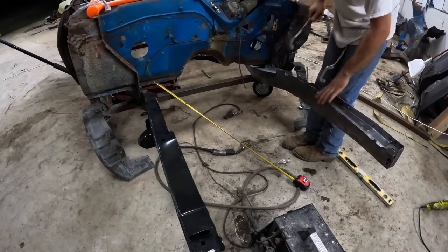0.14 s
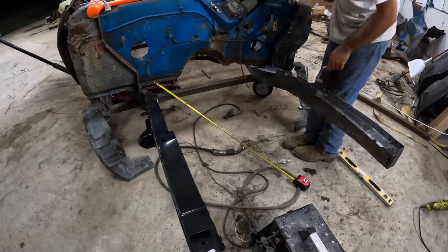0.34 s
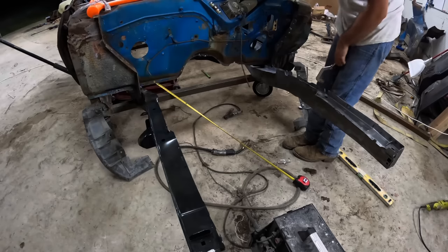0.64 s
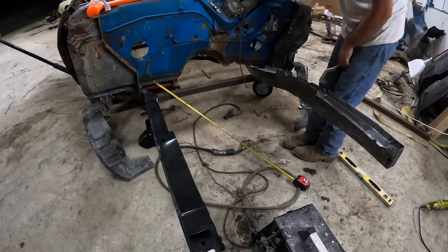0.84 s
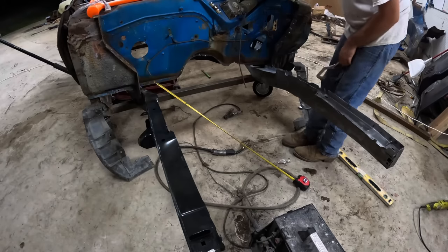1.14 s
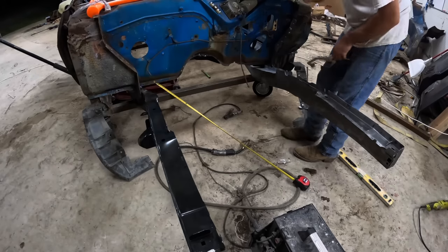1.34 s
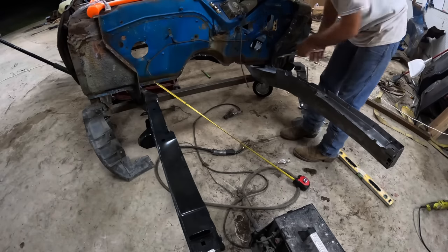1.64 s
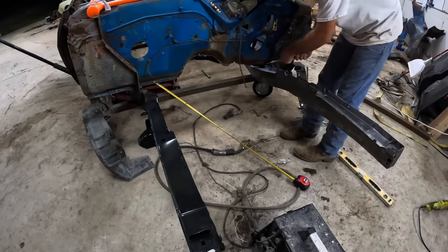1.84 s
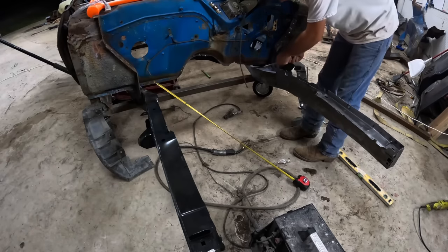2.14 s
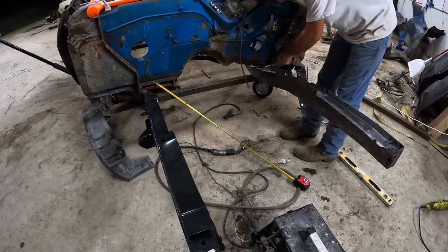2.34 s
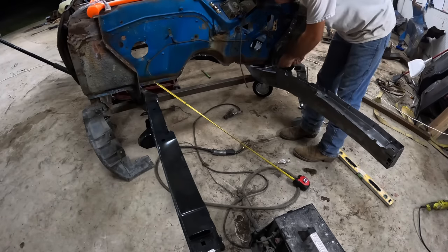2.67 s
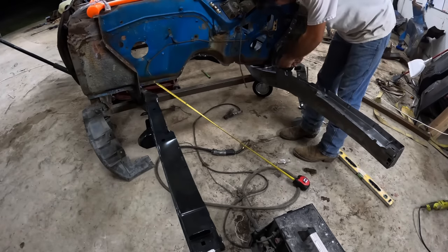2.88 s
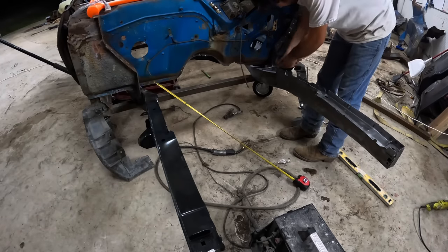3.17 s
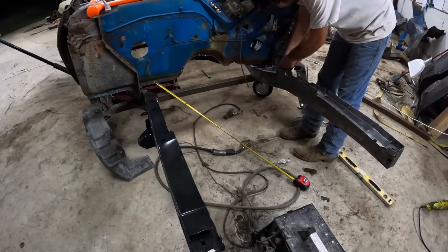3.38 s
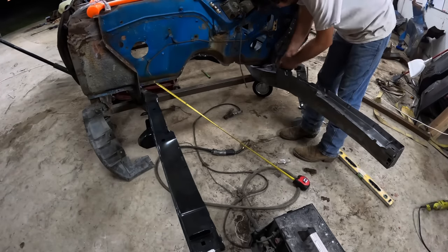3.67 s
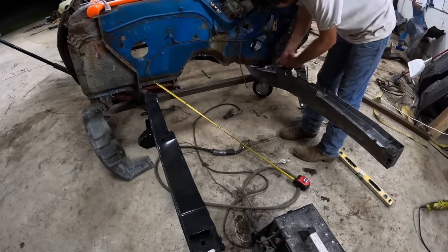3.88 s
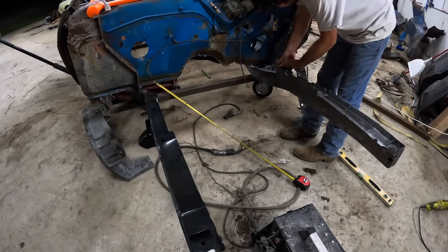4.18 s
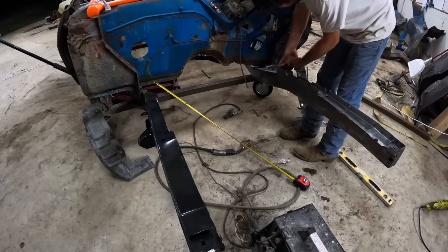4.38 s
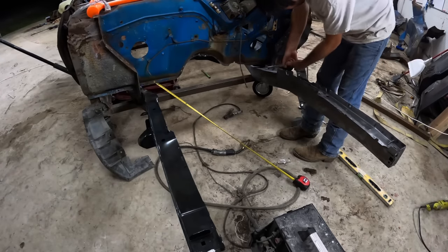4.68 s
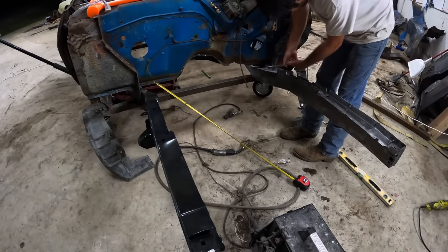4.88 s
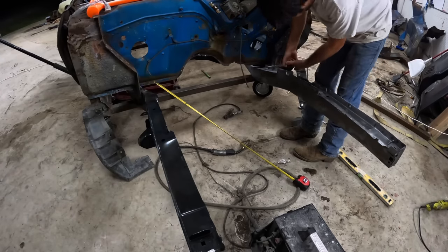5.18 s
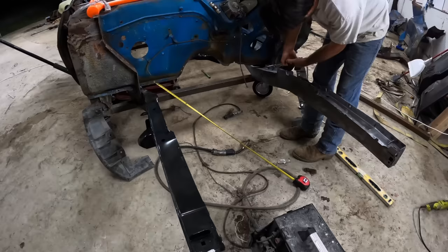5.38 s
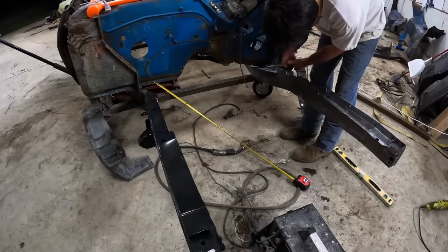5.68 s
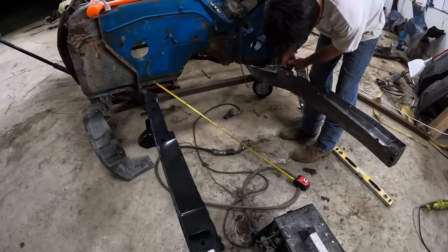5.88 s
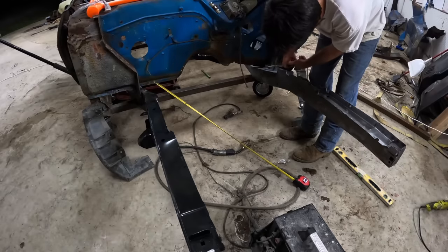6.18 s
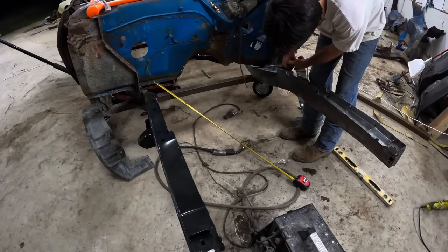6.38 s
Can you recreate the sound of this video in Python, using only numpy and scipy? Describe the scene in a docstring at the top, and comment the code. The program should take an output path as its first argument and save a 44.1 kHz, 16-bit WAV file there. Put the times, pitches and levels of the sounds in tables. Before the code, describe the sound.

Hand work on loose steel: dull thuds with rattling cracks, brief high metallic pings and gritty slides, irregularly spaced with gaps. Behind it, through an open door, a heavy vehicle drives by with a wavering low exhaust drone and a soft rush of tyres peaking just after the middle. The strongest clang, with a clear high ring, comes near the end, then faint ticks. Stereo, modestly reverberant workshop, very faint hiss.

```python
"""A steel clamp is knocked and slid onto a loose steel rail in an open workshop with a concrete floor.
Blows ring modes of rail and clamp and shake out gritty rattle; dense uneven grit makes the scrapes.
Outside the open door a heavy vehicle drives past: two sines give an exhaust note that sinks in pitch,
shaped noise the rumble, whine and roar of its tyres. A faint whistle, hiss and moving air lie beneath.
The stereo microphones hear a short diffuse room tail behind the rail and its rattle."""
import sys
import numpy as np
from scipy import signal
from scipy.fft import rfft, irfft
from scipy.io import wavfile

SR = 44100
rng = np.random.default_rng(int(sys.argv[2]) if len(sys.argv) > 2 else 0)


def digitize_waveform(pressure):
    """Quantize a signal to 16-bit integers and store it at the path in sys.argv[1].

    Rows of a 2-D input are taken as channels; values are limited to [-1, 1].
    """
    field = np.atleast_2d(pressure).T
    bounded = np.clip(field, -1, 1)
    quanta = np.round(bounded * 32767).astype(np.int16)
    wavfile.write(sys.argv[1], SR, quanta)


N = 287532

# Spectra below give relative level: each shaped noise is brought to unit rms before its level is set.

# Microphone hiss: (frequency [Hz], relative level [dB])
HISS_SPECTRUM = [(1180, -40.5), (2000, -30.5), (2870, -57.5), (4570, 14.5), (5320, 5.5), (6620, -3),
                 (15000, -19.5)]
HISS_DB = -75
# Air moving over the microphones: (frequency [Hz], relative level [dB])
AIR_SPECTRUM = [(12, -42), (20, -4.5), (48, -8), (65, -14.5), (84, -33), (140, -120)]
AIR_DB = -48.5
# Microphone colour: (frequency [Hz], gain [dB])
CAPSULE_COLOUR = [(20, 1.5), (7000, -1.5), (8300, -7), (15000, -1)]
CUTOFF_HZ = 15400
# Stereo width of noise and room tail: (frequency [Hz], side minus mid [dB])
STEREO_SPREAD = [(60, -45.5), (130, -67), (290, -22), (630, -12.5), (1390, -9), (3060, -4.5), (6710, -13.5),
                 (14700, -2)]

# A faint steady whistle
WHISTLE_HZ, WHISTLE_WIDTH_HZ, WHISTLE_DB = 4650, 260, -84

# Stereo lean of vehicle and whistle: (frequency [Hz], left minus right [dB])
OUTSIDE_LEAN = [(60, 0.0), (180, 0.0), (540, 1.0), (1630, 2.5), (4900, 1.5), (14700, 3.0)]
# Distant road noise, before a trim per layer: (time [s], rumble level [dB], tyre whine level [dB])
ROAD_LEVELS = [(0.0, -48.5, -61), (0.5, -58, -61.5), (0.9, -52.5, -55.5), (1.5, -47.5, -54),
               (2.0, -49, -47), (2.5, -39.5, -39), (3.0, -46, -46), (3.25, -43.5, -48), (3.6, -37, -36),
               (3.92, -32.5, -34.5), (4.12, -38, -43), (4.45, -41, -48), (5.121, -44, -53),
               (5.54, -46, -56.5), (6.52, -55.5, -64.5)]
# Low road rumble: (frequency [Hz], relative level [dB])
RUMBLE_SPECTRUM = [(35, -29), (60, -9.5), (100, -1.5), (135, -7.5), (289, -13), (344, -24.5), (525, -25.5),
                   (700, -55), (910, -75), (1540, -120)]
# Far tyre whine: (frequency [Hz], relative level [dB])
WHINE_SPECTRUM = [(290, -59.5), (500, -35), (576, -12.5), (745, -13.5), (922, -4.5), (1250, -2.5),
                  (1680, -10.5), (4740, -24), (6300, -27), (7060, -29), (7910, -31), (15000, -56.5)]
# Near tyre roar: (frequency [Hz], relative level [dB])
ROAR_SPECTRUM = [(130, -41), (220, 11.5), (342, -12.5), (401, 6.5), (496, -4), (646, 2), (2430, -22.5),
                 (5680, -21), (12100, -45.5), (15000, -73)]
# Near tyre roar peaks as the vehicle crosses the doorway; level before its trim
PASS_S, PASS_WIDTH_S, PASS_DB, PASS_FALL_DB = 3.676, 0.29, -29, 22
# Exhaust note, swelling and dropping out as the path changes, before a slight waver:
# (time [s], firing rate [Hz], fundamental level [dB])
EXHAUST_NOTE = [(0.0, 89.6, -42.5), (0.13, 89.6, -52), (0.27, 89.3, -43), (0.95, 87.3, -36.5),
                (1.2, 86.8, -39), (1.46, 87, -64), (1.6, 86.7, -38.5), (1.96, 85.8, -27),
                (2.2, 85.7, -31.5), (2.54, 84.2, -27), (2.6, 84.1, -38.5), (2.79, 83.6, -34.5),
                (2.86, 83.3, -27), (3.08, 83, -23), (3.33, 81.9, -25.5), (3.48, 80.8, -41.5),
                (3.68, 80.4, -48), (3.75, 81.1, -37), (4.22, 80.6, -25.5), (4.62, 79.8, -32),
                (4.75, 80.2, -45.5), (4.9, 80, -34.5), (5.12, 80, -39), (5.29, 79.6, -32), (5.4, 77.6, -43),
                (5.48, 75.6, -38), (5.56, 75, -60), (5.62, 78, -41)]
# Exhaust at twice the firing rate, before a waver: (time [s], level [dB])
EXHAUST_SECOND_ORDER = [(2.5, -41.5), (2.98, -52.5), (3.46, -45.5), (3.82, -30.5), (3.92, -34.5),
                        (4.25, -33.5), (4.35, -42.5), (4.7, -40.5), (5.26, -50), (5.65, -66)]

# Reverberation of the workshop: (frequency [Hz], t60 [s])
WORKSHOP_T60 = [(100, 0.82), (500, 0.57), (2000, 0.41), (6000, 0.73), (12000, 0.55)]
ROOM_EDGES_HZ = 22 * 2 ** np.arange(0, 9.6, .5)   # half-octave bands of the tail
# Stereo lean of the steel work: (frequency [Hz], left minus right [dB])
STEEL_LEAN = [(60, 0.0), (130, 0.0), (290, -0.5), (630, -1.0), (1390, -1.0), (3060, -1.5), (6710, -0.5),
              (14700, 1.0)]
# Stereo phase of the steel work: (frequency [Hz], lead of left [rad])
STEEL_PHASE = [(0, 0), (2500, -0.081), (5860, 0.35), (11700, 0.36), (12400, 0.3), (13300, -0.2),
               (13500, 0.1), (14900, 0.0)]

# Steel slid along steel: (start [s], swell [s], hold [s], fade [s], level held [dB])
SCRAPE_STROKES = [(-0.1, 0.055, 0.07, 0.23, -55), (0.987, 0.037, 0.064, 0.23, -35.5),
                  (1.403, 0.082, 0.027, 0.076, -49), (5.356, 0.082, .07, 0.15, -45),
                  (5.666, 0.12, .01, 0.016, -41)]
# Scraping grit: (frequency [Hz], relative level [dB])
SCRAPE_SPECTRUM = [(180, -34), (300, -4), (814, -12), (1090, -6.5), (1370, -6.5), (1490, -14.5),
                   (4540, -10), (11900, -27), (15000, -42)]
SCRAPE_RANGE_DB = 20   # climbed in the swell, lost in the fade

# Clamp modes, damped by the hand: (frequency [Hz], relative level [dB], t60 [s])
CLAMP_MODES = [(3200, -10, .06), (3900, -9, .1), (4900, -8, .06), (5420, -8, .14), (5950, -3, .05),
               (6480, -4, .15)]
# Blows that set the clamp ringing, before chance and mode level:
# (time [s], peak level [dB], pitch favoured [Hz])
CLAMP_PINGS = [(1.0241, -12.5, 5070), (1.3104, -44, 5950), (2.1836, -24.5, 6370), (2.466, -16, 3900),
               (3.1991, -28, 4780), (3.8478, -19, 5330), (3.901, -14, 3820), (5.762, -5, 3296),
               (5.7824, -23.5, 6740)]

# Rail modes: (frequency [Hz], relative level [dB], t60 [s])
RAIL_MODES = [(98, -4, .15), (160, -4, .15), (190, -2, .15), (215, -6, .12), (265, -2, .14), (292, 0, .14),
              (328, 0, .14), (350, 0, .14), (380, -4, .12), (409, -6, .12), (458, -3, .12), (555, -5, .1),
              (598, -5, .1), (684, -3, .1), (740, -2, .1), (908, -1, .1), (969, -1, .1), (1012, -3, .08),
              (1150, -3, .08), (1190, -3, .08), (1413, -2, .09), (1500, -5, .06), (1709, -3, .07),
              (1860, -5, .06), (1978, -5, .06), (2190, -5, .06), (2503, -2, .08), (2632, -3, .07),
              (3050, -4, .06)]
# Blows, levels relative within the steel work: (time [s], thud level [dB],
# pitch favoured by the struck spot [Hz], crack level [dB], crack brightness [dB per octave])
STEEL_BLOWS = [(0.939, -13, 1020, -24, 3.5), (0.947, -12.5, 304, -16.5, 2.5),
               (0.9547, -24.5, 342, -19, -27), (0.9726, -17.5, 286, -28, -20), (1.0038, -18, 372, -29, -11),
               (1.0243, -19, 910, -31, 1.5), (1.0315, -17.5, 323, -40, -2), (1.053, -23, 975, -39, 1),
               (1.1929, -12, 370, -38, 3.5), (1.2045, -17, 410, -31, -8), (1.2443, -17.5, 365, -43, -4),
               (1.2577, -21.5, 557, -42, -2), (1.2842, -25.5, 694, -39, -12), (1.3086, -19, 300, -41.5, -2),
               (1.3393, -32, 245, -44.5, -3), (1.4389, -45, 193, -39.5, -8.5),
               (1.7875, -48, 179, -49.5, -2), (1.8746, -57, 200, -50, 7), (2.1847, -17, 810, -22, -9.5),
               (2.199, -20.5, 200, -45, -6), (2.229, -19, 213, -46, -8), (2.2513, -46, 880, -18.5, -4),
               (2.2545, -22, 760, -17, -2.5), (2.4583, -36, 710, -26, -3), (2.4654, -29, 710, -25.5, 2.5),
               (2.4798, -20, 482, -28, -21), (2.6295, -35, 880, -44, 2), (2.729, -41, 191, -34.5, -23),
               (2.828, -26.5, 1160, -27, -19), (3.1986, -36, 407, -40, 2), (3.8403, -30.5, 340, -27.5, -1),
               (3.8478, -16, 830, -20, -7), (3.8875, -19.5, 930, -18, -2), (3.8991, -23, 388, -20.5, -12),
               (4.0547, -33, 1020, -38.5, 3), (4.814, -24.5, 895, -32.5, -5), (5.2063, -52, 200, -51, 2.5),
               (5.2742, -53, 190, -50.5, -0.5), (5.7508, -19, 665, -30, -2), (5.7615, -16, 697, -18, -1.5),
               (5.7761, -15.5, 750, -42, -9), (5.7824, -9.5, 102, -23, -5), (5.8074, -24, 162, -33.5, 5),
               (5.824, -21.5, 264, -46, -11), (5.8613, -26.5, 352, -39, -12),
               (6.366, -36, 1150, -49.5, 2.5), (6.3824, -33.5, 400, -53, -16)]
THUD_FALLS_DB = 7, 10   # per octave below and above the favoured pitch
# Crack falls in dB per octave below the first pitch and above the second
CRACK_HZ, CRACK_TOP_HZ, CRACK_FALLS_DB = 2380, 5450, (5.5, 17.5)
# Bands of the crack and rattle: (low edge [Hz], high edge [Hz])
RATTLE_BANDS = [(1700, 3400), (90, 220), (220, 430), (430, 850), (850, 1700), (3400, 7500), (7500, 12500)]
# Decay of the crack and rattle: (frequency [Hz], t60 [s])
RATTLE_DECAY = [(140, 0.13), (600, .1), (1200, 0.14), (2400, 0.073), (9700, 0.047)]


def from_db(db):
    """Gain of a level."""
    return 10 ** (np.asarray(db) / 20)


def rms_one(x):
    """Scaled to unit rms."""
    return x / np.sqrt(np.mean(x ** 2) + 1e-20)


def in_time(rows, **ends):
    """Columns of a curve, sample by sample."""
    s, *columns = np.transpose(rows)
    return [np.interp(np.arange(N) / SR, s, c, **ends) for c in columns]


def at_hz(points, hz):
    """A spectrum read on a log-frequency axis."""
    point_hz, value = np.array(points).T
    return np.interp(np.log(hz), np.log(point_hz), value)


def spectrum_hz():
    """Frequencies of the whole scene's spectrum, kept above zero for the logarithm."""
    return np.maximum(np.arange(N // 2 + 1) * SR / N, 1)


def drift(rate_hz):
    """Slow chance with spread 1: low-passed noise drawn every 40 samples."""
    r = np.exp(-80 * np.pi * rate_hz / SR)
    white = rng.standard_normal(N // 40 + 2002)
    slow = signal.lfilter([1], [1, -2 * r, r * r], white)[2000:]   # settled part only
    return np.interp(np.arange(N) / 40, np.arange(len(slow)), rms_one(slow))


def band(x, low, high):
    """Band-pass."""
    return signal.sosfilt(signal.butter(2, [low, high], "band", fs=SR, output="sos"), x)


def stereo(mid, side, hz):
    """Left and right from a shared and an opposed part."""
    return mid + from_db(at_hz(STEREO_SPREAD, hz)) * side * [[1], [-1]]


def coloured(white, spectrum):
    """Mid and side noise shaped to a spectrum, spread to stereo; rms 1."""
    hz = spectrum_hz()
    shape = from_db(at_hz([(0.64, -82)] + list(spectrum) + [(SR, -120)], hz))
    mid, side = rfft(white) * shape
    return rms_one(irfft(stereo(mid, side, hz), N))


def leaning(x, lean, phase):
    """Level and phase shifted between the channels, frequency by frequency."""
    hz = spectrum_hz()
    half = from_db(at_hz(lean, hz) / 2) * np.exp(.5j * at_hz(phase, hz))
    return irfft(rfft(x) * [half, 1 / half], N)


def hiss():
    """Steady microphone noise, shaped from white noise."""
    return from_db(HISS_DB) * coloured(rng.standard_normal((2, N)), HISS_SPECTRUM)


def moving_air():
    """Very low noise of air moving over the microphones."""
    return from_db(AIR_DB) * coloured(rng.standard_normal((2, N)), AIR_SPECTRUM)


def whistle():
    """Noise twice through a narrow resonance."""
    edges = WHISTLE_HZ - WHISTLE_WIDTH_HZ / 2, WHISTLE_HZ + WHISTLE_WIDTH_HZ / 2
    narrow = band(band(rng.standard_normal(N), *edges), *edges)
    return from_db(WHISTLE_DB) * rms_one(narrow)


def road():
    """Rumble, far whine and near roar of the tyres, each flickering slightly."""
    rumble_db, whine_db = in_time(ROAD_LEVELS)
    from_pass = (np.arange(N) / SR - PASS_S) / PASS_WIDTH_S
    roar_db = PASS_DB - PASS_FALL_DB * np.log10(1 + from_pass ** 2)
    layers = [(rumble_db, RUMBLE_SPECTRUM, 2.5), (whine_db, WHINE_SPECTRUM, 1.5),
              (roar_db, ROAR_SPECTRUM, -1.5)]
    out = np.zeros((2, N))
    for level_db, spectrum, trim_db in layers:
        gain = from_db(level_db + trim_db + 0.56 * drift(27))
        out += gain * coloured(rng.standard_normal((2, N)), spectrum)
    return out


def exhaust():
    """Two engine orders whose pitch and strength waver as the path changes."""
    hz, first_db = in_time(EXHAUST_NOTE)
    after_last = np.maximum(np.arange(N) / SR - EXHAUST_NOTE[-1][0], 0)
    first_db = first_db - 40 * after_last   # it fades into the distance
    second_db, = in_time(EXHAUST_SECOND_ORDER, left=-62, right=-84)
    turn = 2 * np.pi * np.cumsum(hz * (1 + 0.0037 * drift(11.0))) / SR
    first = from_db(first_db + 0.59 * drift(42)) * np.sin(turn)
    second = from_db(second_db + 3.5 * drift(44)) * np.sin(2 * turn)
    return np.sqrt(2) * (first + second)   # levels are rms


def workshop(x, tail_db):
    """Direct sound and a diffuse tail that dies band by band."""
    t = np.arange(SR) / SR
    white = rng.standard_normal((2, 2, SR))
    response = np.zeros((2, SR))
    build = 1 - np.exp(-t / 0.0009)   # reflections take time to gather
    for k, (low, high) in enumerate(zip(ROOM_EDGES_HZ, ROOM_EDGES_HZ[1:])):
        hz = np.sqrt(low * high)
        decay = from_db(tail_db - 60 * t / at_hz(WORKSHOP_T60, hz))
        mid, side = band(white[k % 2], low, high) * build * decay
        response += stereo(mid, side, hz)
    response[:, 0] += 1   # direct sound
    return signal.fftconvolve(x[None], response)[:, :N]


def scrapes():
    """Dense uneven grit clicks under each stroke, which swells, holds and fades."""
    stroke = np.zeros(N)
    for s, swell, hold, fade, db in SCRAPE_STROKES:
        held = s + swell
        release = held + hold
        shape = [(s, -SCRAPE_RANGE_DB), (held, 0), (release, 0), (release + fade, -SCRAPE_RANGE_DB)]
        shape_db, = in_time(shape, left=-99, right=-99)
        stroke += from_db(db + shape_db)
    grit = rng.standard_normal((2, N)) * from_db(1.4 * rng.exponential(1, N))
    return stroke * coloured(grit, SCRAPE_SPECTRUM)


def ring(clicks, hz, t60):
    """A unit click sets a sine of height 1 ringing."""
    r, w = from_db(-60 / (t60 * SR)), 2 * np.pi * hz / SR
    return signal.lfilter([0, np.sin(w)], [1, -2 * r * np.cos(w), r * r], clicks + 1e-18)


def struck(modes, times, level_db_at, spread_db):
    """Every blow strikes every mode with a strength and sign of its own."""
    at = np.round(times * SR).astype(int)
    chance = rng.standard_normal((len(at), len(modes), 2))
    out = np.zeros(N)
    for k, (hz, mode_db, t60) in enumerate(modes):
        strength_db = level_db_at(hz) + mode_db + spread_db * chance[:, k, 0]
        clicks = np.zeros(N)
        clicks[at] = from_db(strength_db) * np.sign(chance[:, k, 1])
        out += ring(clicks, hz, t60)
    return out


def clamp():
    """Only the mode close to the pitch that the struck spot favours rings out; no room tail."""
    s, peak_db, spot_hz = np.transpose(CLAMP_PINGS)

    def level_db(hz):
        return peak_db - 200 * np.abs(np.log(hz / spot_hz))

    return struck(CLAMP_MODES, s, level_db, spread_db=1)


def contact_db(hz):
    """Level of every blow at a pitch: a thud centred on the struck spot plus a tilted crack."""
    _, thud_db, spot_hz, crack_db, bright_db = np.transpose(STEEL_BLOWS)
    octaves = np.log2(hz / spot_hz)
    thud_db = thud_db - np.where(octaves < 0, -THUD_FALLS_DB[0], THUD_FALLS_DB[1]) * octaves
    below = min(np.log2(hz / CRACK_HZ), 0)
    above = max(np.log2(hz / CRACK_TOP_HZ), 0)
    between = np.log2(np.clip(hz, CRACK_HZ, CRACK_TOP_HZ) / CRACK_HZ)
    crack_db = crack_db + CRACK_FALLS_DB[0] * below - CRACK_FALLS_DB[1] * above + bright_db * between
    return 10 * np.log10(from_db(thud_db) ** 2 + from_db(crack_db) ** 2)


def rail():
    """Rail modes struck by every blow; those close to the favoured pitch ring out above the rest."""
    s, spot_hz = np.array(STEEL_BLOWS)[:, [0, 2]].T

    def level_db(hz):
        return contact_db(hz) + np.maximum(7 - 40 * np.abs(np.log(hz / spot_hz)), 0)

    return struck(RAIL_MODES, s, level_db, spread_db=5.5)


def rattle():
    """Crack and rattle of loose steel: gritty noise that dies after every blow, band by band."""
    s = np.array(STEEL_BLOWS)[:, 0]
    t = np.arange(SR // 2) / SR
    roughness = from_db(0.65 * rng.exponential(1, N))
    out = np.zeros(N)
    for low, high in RATTLE_BANDS:
        hz = np.sqrt(low * high)
        onset = 1 - np.exp(-t / (0.00044 + 0.71 / hz))   # lows start later
        dying = onset * from_db(-60 * t / max(at_hz(RATTLE_DECAY, hz), .005))
        hits = np.zeros(N)
        hits[(s * SR).astype(int)] = from_db(contact_db(hz)) ** 2
        power = np.maximum(signal.fftconvolve(hits, dying ** 2)[:N], 0)
        grit = rms_one(band(rng.standard_normal(N) * roughness, low, high))
        out += band(grit * np.sqrt(power), low / 1.57, high * 1.75)
    return out


def blows():
    """Each knock is the ringing rail plus the rattle of loose steel."""
    return from_db(-13.5) * rail() + from_db(-3) * rattle()


def scene():
    """Steel work in the workshop, the vehicle heard through the open door."""
    # only rail and rattle carry the room tail
    steel = workshop(blows(), tail_db=-37.5) + clamp() + scrapes()
    outside = exhaust() + road() + whistle()
    outside_phase = [(1, 0.0017)]   # the same small lead of left at every frequency
    return leaning(steel, STEEL_LEAN, STEEL_PHASE) + leaning(outside, OUTSIDE_LEAN, outside_phase)


def record(dry):
    """The microphones lose treble, hiss faintly and feel the air; the top is cut."""
    heard = irfft(rfft(dry) * from_db(at_hz(CAPSULE_COLOUR, spectrum_hz())), N)
    top_cut = signal.cheby2(12, 70, CUTOFF_HZ, fs=SR, output="sos")
    return signal.sosfilt(top_cut, heard + hiss() + moving_air())


dry = scene()
out = record(dry)
digitize_waveform(out)
```